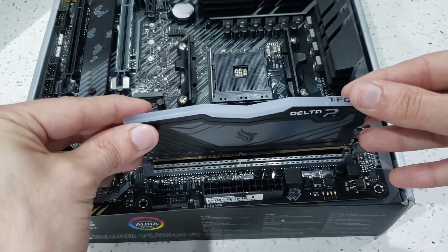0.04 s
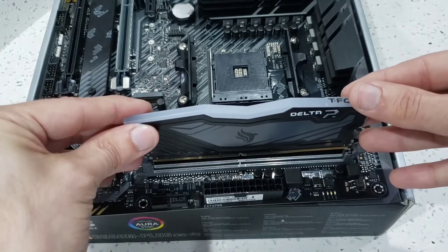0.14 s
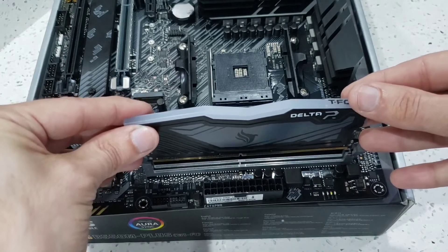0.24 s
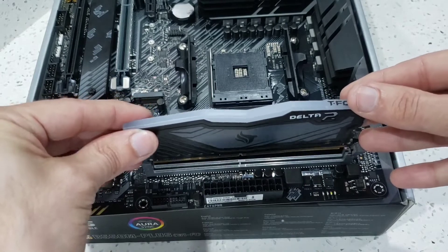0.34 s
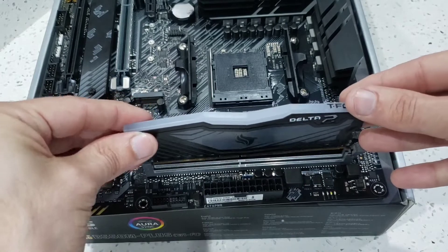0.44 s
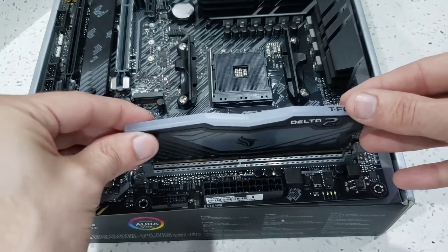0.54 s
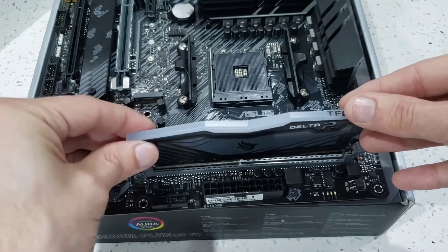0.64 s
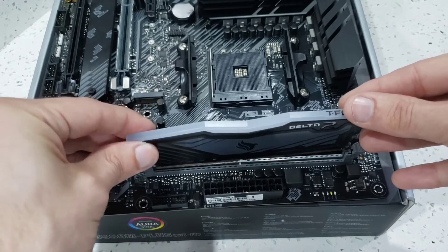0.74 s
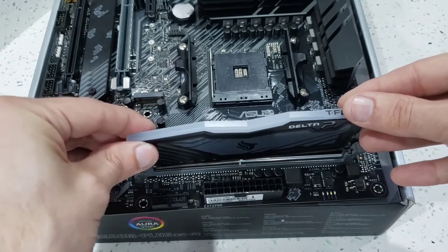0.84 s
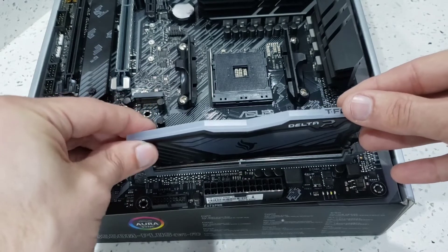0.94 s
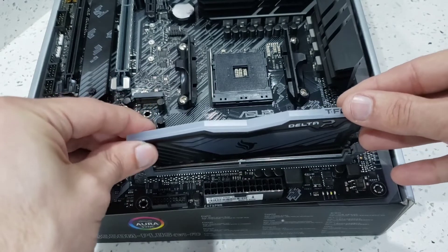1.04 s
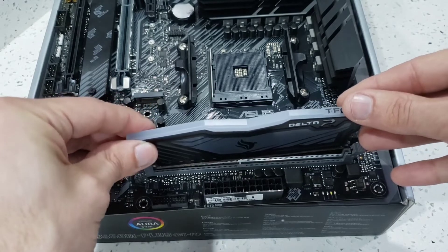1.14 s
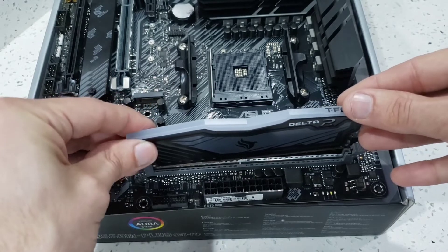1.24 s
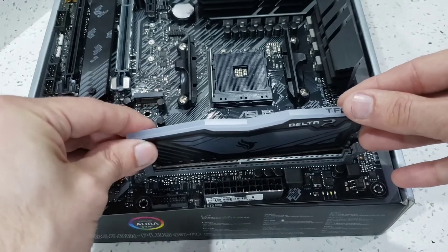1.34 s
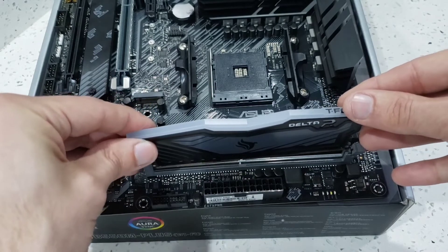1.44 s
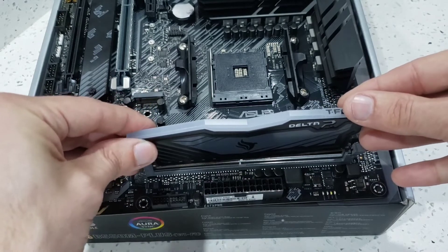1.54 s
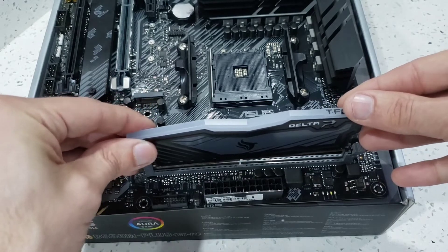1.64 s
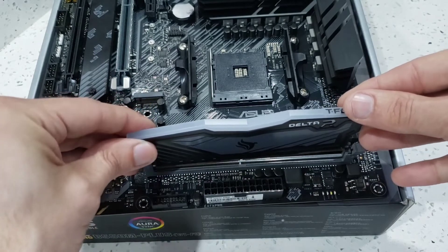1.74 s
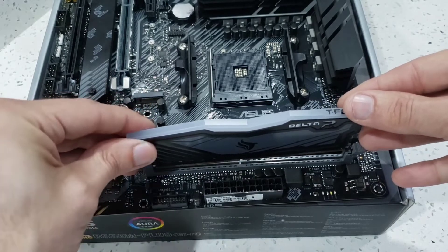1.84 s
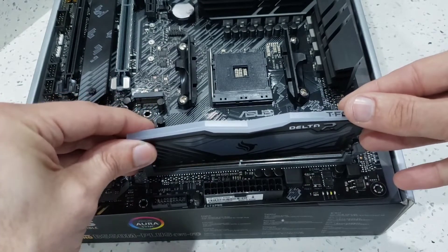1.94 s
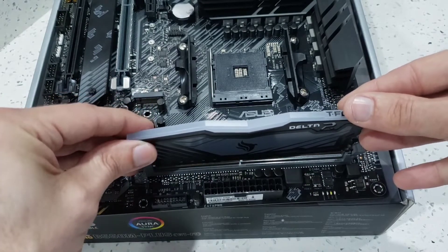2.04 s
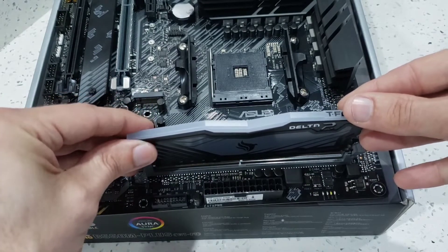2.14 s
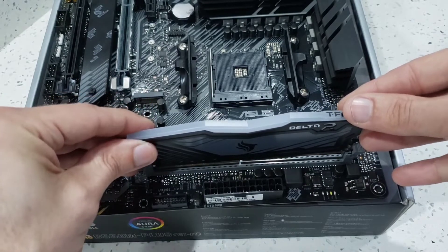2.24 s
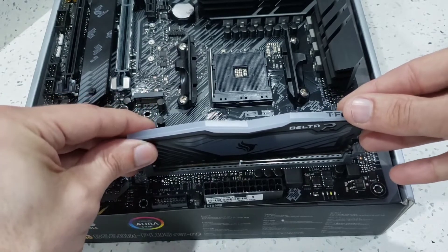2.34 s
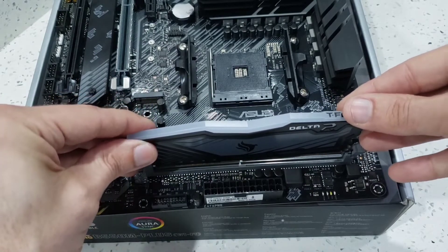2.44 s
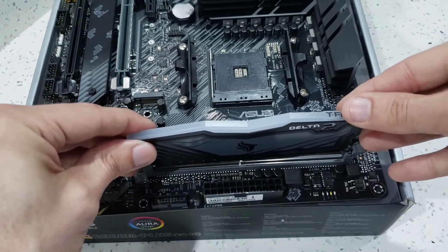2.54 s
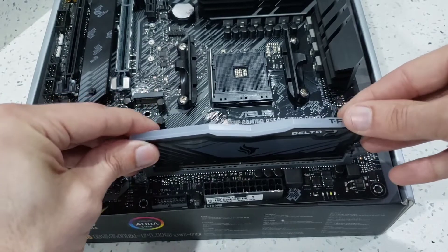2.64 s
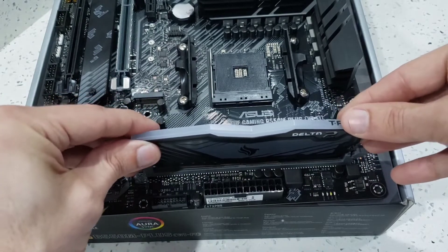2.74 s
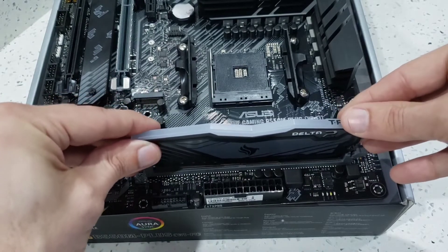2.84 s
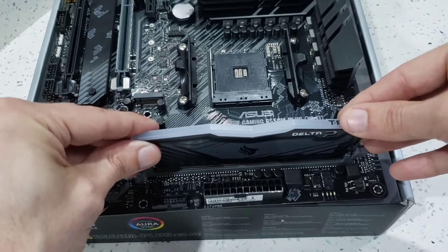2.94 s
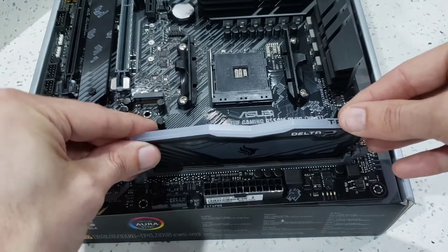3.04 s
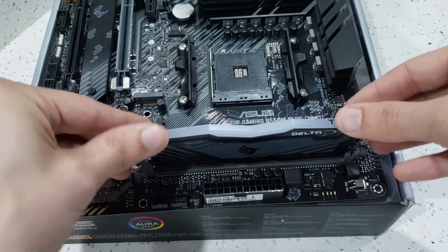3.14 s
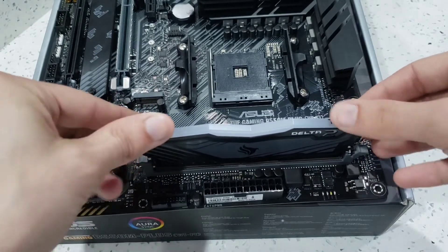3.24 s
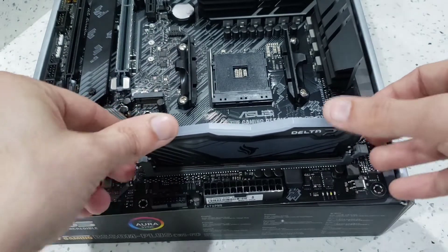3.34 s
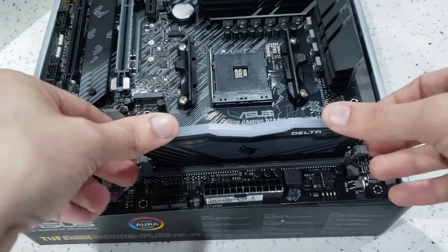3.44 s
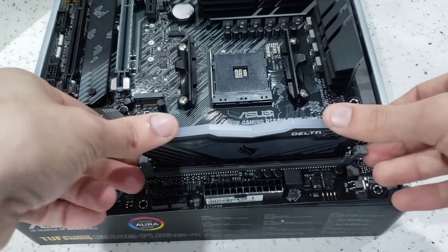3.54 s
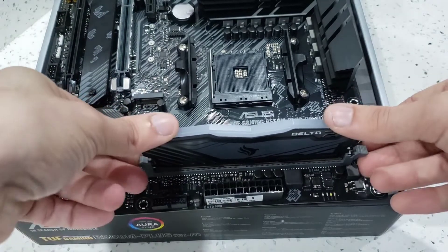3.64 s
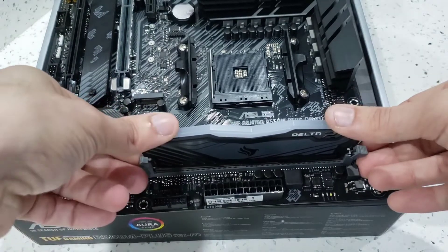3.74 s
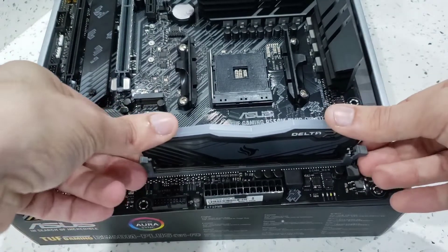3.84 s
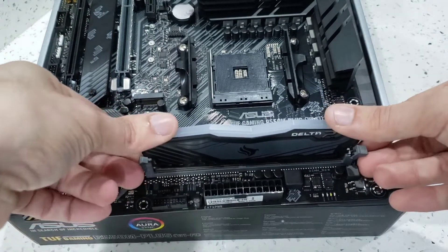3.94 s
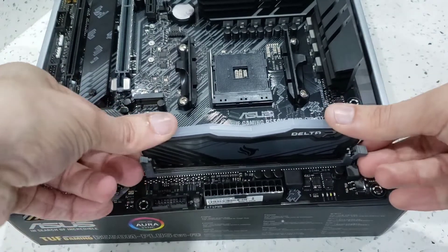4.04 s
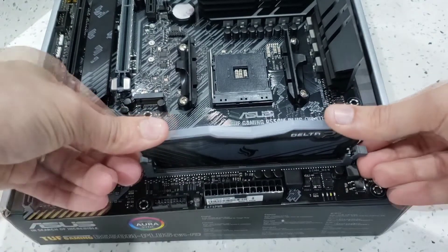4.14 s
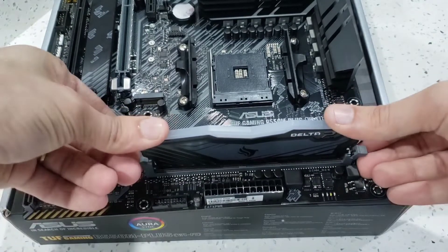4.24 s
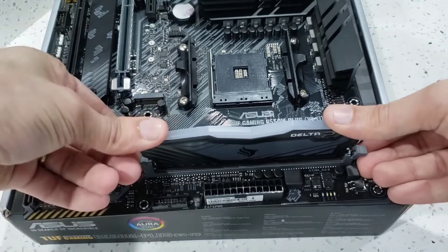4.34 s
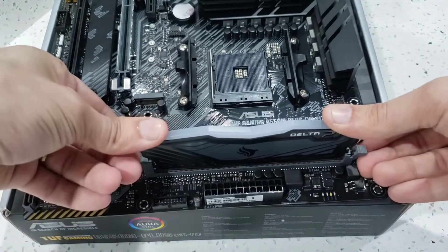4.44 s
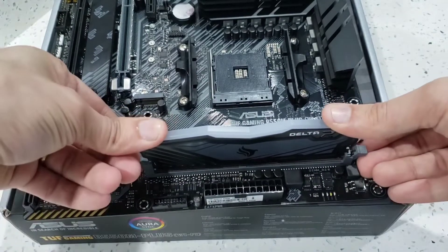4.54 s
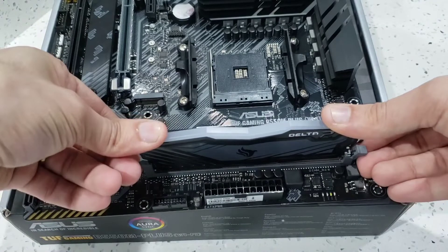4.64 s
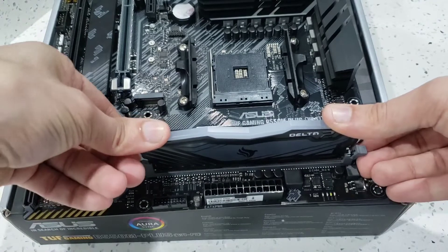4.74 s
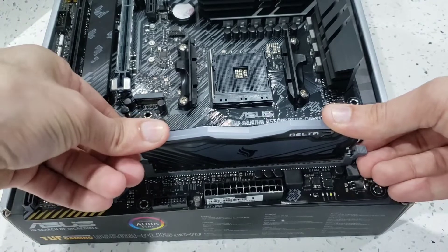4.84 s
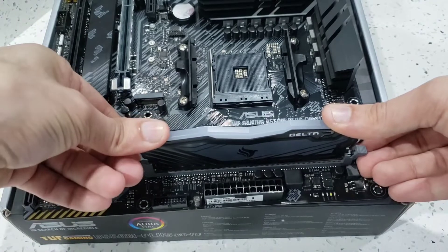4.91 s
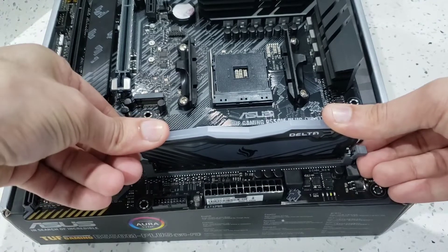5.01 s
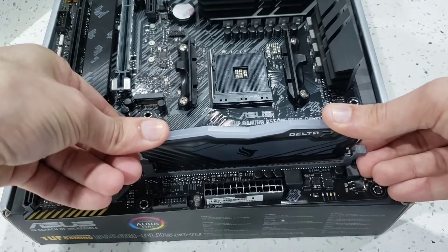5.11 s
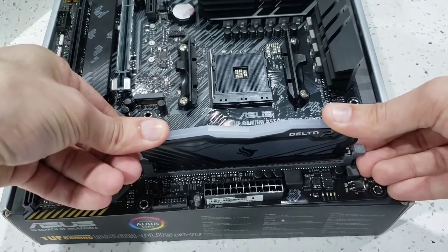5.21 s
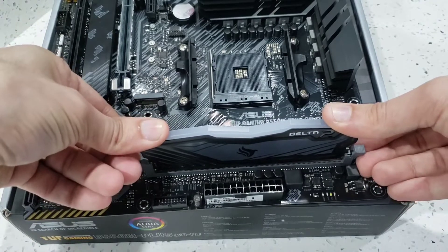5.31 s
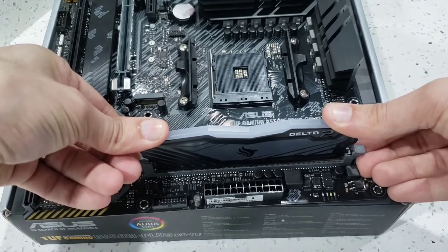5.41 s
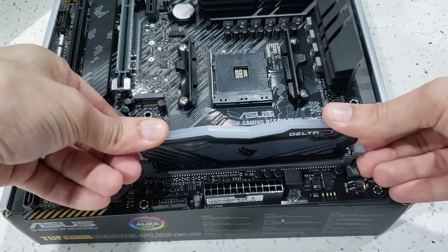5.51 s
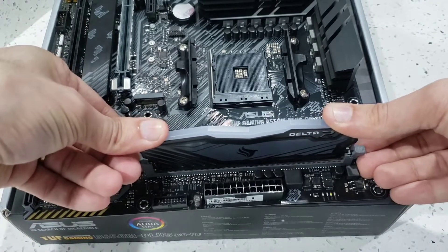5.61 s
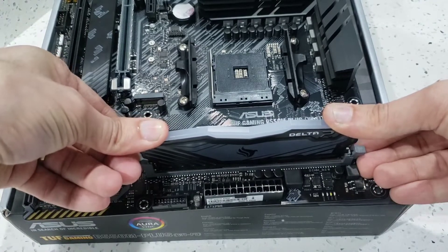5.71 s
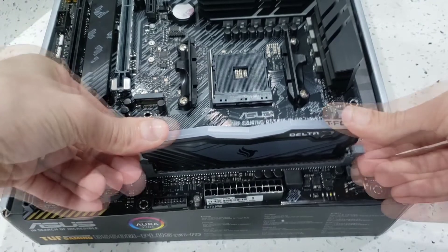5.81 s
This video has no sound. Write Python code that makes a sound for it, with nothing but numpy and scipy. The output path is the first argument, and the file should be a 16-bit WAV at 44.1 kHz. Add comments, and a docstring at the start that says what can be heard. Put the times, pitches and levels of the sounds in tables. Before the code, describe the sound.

A quiet small room with low mains hum, soft rumble, thin hiss and a barely perceptible high whine. From about 0.3 s fingers rub dully and soft shoves make the cardboard box thump; at 0.6-0.7 s the module's edge gives a short scratch and two light knocks. Fainter taps follow at 1.1-1.4 s and 1.9-2.0 s. At about 2.6-2.7 s a tight cluster of firmer, woody bumps and scrapes shakes board and box, with single knocks near 3.1 and 3.7 s, the latter with a tiny click. After a faint tick at 4.2 s, the first latch snaps at 4.56 s: a loud, bright crack, rapidly chattering, with a board thump and brief reverberation, then a small knock at 4.7 s. The second latch snaps at 5.18 s, crisp, sharp and shorter. The room settles, with a slight finger rub near 5.85 s.

```python
"""A small room: a memory module is slid into its slot on a motherboard that lies on a cardboard box.
Its edge scrapes as slip-modulated noise; knocks and shoves ring the board's modes and swing the box.
Pressed home, the latches snap shut one after the other: runs of noise cracks, latch modes and board blows.
Noise reflections form the room; finger rub, mains hum, a faint whine, rumble and hiss lie underneath."""
import sys
import numpy as np
from scipy import signal
from scipy.fft import rfft, irfft, next_fast_len
from scipy.io import wavfile

SR = 44100
rng = np.random.default_rng(int(sys.argv[2]) if len(sys.argv) > 2 else 0)


def wav_record(signal):
    """Record a signal, one row per channel, as 16-bit PCM in the file named by sys.argv[1]."""
    frames = np.transpose(np.atleast_2d(signal))
    bounded = np.clip(frames, -1, 1)
    # unit amplitude maps onto the largest positive 16-bit level
    quanta = np.round(bounded * 32767).astype(np.int16)
    wavfile.write(sys.argv[1], SR, quanta)


N = 258867
TIME = np.arange(N) / SR
AGE = TIME[:SR // 4]  # time since a blow, s


# Latches snapping shut, the second nudged once before it shuts: [t/s, level/dB before the layer trims]
FIRST_SNAPS = [(4.557, -1.5)]
SECOND_SNAPS = [(3.666, -24.5), (5.1768, -0.5)]


def chatter(snaps, count, gap_s, slowing, crack_db, crack_loss_db, ring_db, ring_loss_db,
            board_db, board_loss_db):
    """Each snap bounces into ever wider spaced contacts: rows of (s, crack dB, latch ring dB, board dB)."""
    widening = slowing ** np.arange(count)
    lags = gap_s * (np.cumsum(widening) - widening)
    contacts = []
    for s, db in snaps:
        for i in range(count):
            # crack and board change by a step per contact, the ring by a step per doubling of the contacts
            contact_crack_db = db + crack_db - crack_loss_db * i
            contact_ring_db = db + ring_db - ring_loss_db * np.log2(1 + i)
            contact_board_db = db + board_db - board_loss_db * i
            contacts.append((s + lags[i], contact_crack_db, contact_ring_db, contact_board_db))
    return contacts


# Ringing modes of each plastic latch: [f/Hz, relative level/dB, t60/s, left minus right/dB]
FIRST_LATCH_MODES = [(2030, -29, .025, 0), (2440, -27, .025, 0), (2920, -28, .025, 0), (3400, -25, .01, 0),
                     (4700, -27, .025, -3), (5320, -27, .018, 5), (6910, -25, .018, 7),
                     (7850, -25, .018, 2), (11890, -21, .035, -16), (12120, -19, .03, -16),
                     (12900, -20, .012, -14), (13980, -15, .02, -16), (14500, -5, .011, -20),
                     (14820, -11, .014, -18), (15500, -16, .01, -10)]
SECOND_LATCH_MODES = [(2320, -29, 0.079, 3), (3400, -17.5, 0.015, -5), (3310, -17, 0.019, -14),
                      (5300, -31, 0.02, 13), (6030, -32, 0.011, -24), (7700, -35.5, 0.021, 8),
                      (7720, -31.5, 0.0083, 14), (12140, -3, .005, 2), (12470, -3.5, 0.0074, -12.5),
                      (13600, -5.5, 0.0039, -28), (14800, -6, 0.0044, -22)]
# Noise colour of each latch's crack: [f/Hz, relative level/dB]
FIRST_CRACK_COLOUR = [(200, -5), (780, -4), (1050, -2), (1280, -7.5), (1650, -2.5), (2400, 0), (4200, -1.5),
                      (5500, -1.5), (7500, -3), (9000, -5.5), (11000, -6.5), (12000, -2.5), (13000, -6.5),
                      (14500, -2), (16000, 1)]
SECOND_CRACK_COLOUR = [(300, -24), (700, 2), (1150, -21), (1750, -6), (2270, 10), (2750, -2), (3450, 7),
                       (4600, -5), (5900, 1.5), (7400, 4.5), (8600, -6), (11000, -5.5), (13000, -13.5),
                       (16000, 8.5)]


def snap(contacts, latch_modes, crack_colour, crack_t60, board_hz):
    """A latch jumps its catch: every contact cracks the plastic, rings the latch and shakes the board."""
    out, burst = np.zeros((2, N)), np.zeros(N)
    for s, crack_db, ring_db, board_db in contacts:
        add(burst, s, from_db(crack_db - 60 * TIME[:SR // 10] / crack_t60))
        rings = 0
        for hz, db, t60, balance_db in latch_modes:
            # a random sign per mode and port, drawn anew at every contact
            random_signs = rng.choice([-1, 1], (2, 1))
            rings = rings + from_db(db) * random_signs * panned(balance_db) * ring(hz, t60)
        add(out, s, from_db(ring_db) * rings)
        add(out, s, from_db(board_db) * panned(balance_db=1.5) * board_blow(board_hz, focus=0.88))
    return out + burst * noise(crack_colour)


def seating(s, level_db, hz):
    """As the first latch gives, the module drops home and the box takes the push."""
    out = np.zeros((2, N))
    add(out, s, from_db(level_db) * panned(balance_db=2.5) * box_thud(hz, t60=0.12, swell_s=0.002))
    return out


# Module against slot:
# [t/s, knock level/dB before trim, hit brightness f/Hz, thud level/dB before trim, rocking gap/s]
SLOT_KNOCKS = [(0.618, -42.5, 676, -62, .005), (0.721, -41.5, 560, -60, 0.0044),
               (1.128, -49, 524, -52, 0.0029), (1.27, -50, 450, -57, .005), (1.409, -47, 400, -74, 0.0044),
               (1.866, -45.5, 360, -49, 0.0064), (1.901, -47, 363, -60, 0.0055),
               (1.992, -45, 315, -76, 0.0038), (2.584, -40.5, 640, -31.5, 0.011),
               (2.615, -33, 370, -31, 0.0072), (2.710, -34.5, 1280, -30.5, .0105),
               (3.100, -32.5, 494, -30.5, 0.0059), (3.667, -30, 460, -28, .012),
               (4.179, -53, 720, -64, .005), (4.684, -37, 1220, -39.5, 0.015)]
# Every knock rocks: a light, bright touch, the hit, then a dull settling
TOUCH_DB, TOUCH_BRIGHTER = -8, 1.475
SETTLE_DB, SETTLE_DULLER = -7.5, .6
BOX_HZ = 134


def knocks(knock_db, thud_db):
    """The module bumps in the slot: three contacts ring the board, and the settling swings the box."""
    out = np.zeros((2, N))
    for s, blow_db, brightness_hz, push_db, gap in SLOT_KNOCKS:
        contacts = [(-gap, TOUCH_DB, TOUCH_BRIGHTER), (0, 0, 1), (gap, SETTLE_DB, SETTLE_DULLER)]
        for lag, db, hardness in contacts:
            add(out, s + lag, from_db(blow_db + knock_db + db) * board_blow(brightness_hz * hardness))
        add(out, s + gap, from_db(push_db + thud_db) * box_thud(BOX_HZ, t60=0.12, swell_s=0.0021))
    return out * panned(balance_db=3.0)


# Hands softly shoving board and box: [t/s, push level/dB before the box and board trims, thud f/Hz]
HAND_SHOVES = [(0.277, -37, 101), (0.387, -39, 90.6), (0.567, -35, 83.6), (0.587, -32, 78),
               (2.568, -37.5, 90), (2.603, -39, 74), (2.957, -44.5, 89), (3.024, -37, 81),
               (3.668, -38.5, 93), (4.598, -37, 120.6)]
SHOVE_BOARD_DB, SHOVE_BRIGHTNESS_HZ = -12.5, 480  # how much of a shove the board takes up


def shoves(thud_db):
    """A soft push swings the box and barely sounds the board."""
    out = np.zeros((2, N))
    for s, push_db, push_hz in HAND_SHOVES:
        add(out, s, from_db(push_db + thud_db) * box_thud(push_hz, t60=0.12, swell_s=0.0025))
        add(out, s, from_db(push_db + SHOVE_BOARD_DB) * board_blow(SHOVE_BRIGHTNESS_HZ))
    return out * panned(balance_db=2.5)


# Main modes of the board on its box: [f/Hz, relative level/dB, t60/s]
BOARD_MODES = [(207, -1, 0.13), (258.7, 5.5, 0.12), (322, 0.5, 0.14), (367, -1, 0.095), (432.2, 3.5, 0.1),
               (487.6, -1.5, .08), (646, -2, 0.085), (765.7, 0, 0.061), (862, -3.5, 0.045),
               (1028.5, 0, 0.044), (1474, -9, 0.095), (1730, -5.5, 0.043), (2260, -17.5, 0.051)]
CLACK_DB, CLACK_T60 = -7, .05  # t60 in s


def board_blow(brightness_hz, focus=1.5):
    """A blow rings the board's modes over a noise clack; its hardness picks the range. Peak 1."""
    strengths = from_db(rng.uniform(-2, 2, (len(BOARD_MODES), 2, 1)))
    modes = 0
    for k, (hz, db, t60) in enumerate(BOARD_MODES):
        modes = modes + (-1) ** k * strengths[k] * from_db(db) * ring(hz, t60)
    # the noise stands for many closely packed, damped modes
    clack_band = signal.butter(2, [300, 2400], "band", fs=SR, output="sos")
    dense = signal.sosfilt(clack_band, rng.standard_normal(modes.shape))
    clack = dense / dense.std() * from_db(CLACK_DB - 60 * AGE / CLACK_T60)
    # a resonant low-pass at the contact brightness, then a gentle high-pass an octave below
    w = 2 * np.pi * brightness_hz
    out = signal.lfilter(*signal.bilinear([w * w], [1, w / focus, w * w], SR), modes + clack)
    out = signal.lfilter(*signal.butter(1, min(brightness_hz / 2, SR / 4), "high", fs=SR), out)
    return out / np.abs(out).max()


def box_thud(hz, t60, swell_s):
    """The cardboard box gives way and swings: a low, decaying mode with a soft onset."""
    return ring(hz, t60) * (1 - np.exp(-AGE / swell_s))


def ring(hz, t60):
    """One struck mode: a sine dying away exponentially."""
    return np.sin(2 * np.pi * hz * AGE) * from_db(-60 * AGE / t60)


# Module edge sliding in the guides: [t/s, length/s, level/dB before slip modulation]
GUIDE_SLIDES = [(0.38, .02, -64.5), (0.578, .024, -46.5), (1.845, 0.062, -69), (2.571, .058, -54),
                (2.698, 0.012, -51), (2.985, 0.049, -67), (3.099, .002, -59), (3.324, .003, -64),
                (3.662, .006, -53), (4.177, .005, -63), (4.554, .002, -39), (4.676, .012, -42)]
# Noise colour of the sliding edge: [f/Hz, relative level/dB]
SCRAPE_COLOUR = [(710, -31.5), (1200, -12), (2250, -7.5), (3150, -13.5), (3400, -8.5), (4130, -13.5),
                 (6000, -8), (7100, -5), (8350, -14), (10600, -9.5), (11600, -3.5), (12700, -6),
                 (13700, -1), (16000, -5)]
SLIDE_RISE_S, SLIDE_FALL_S = 0.011, 0.015


def scrapes(grain_db, slips_per_s):
    """Short slides: a hiss broken into tiny random slips, swelling and dying with the stroke."""
    stroke = strokes(GUIDE_SLIDES, SLIDE_RISE_S, SLIDE_FALL_S)
    slips = np.interp(TIME * slips_per_s, np.arange(N), rng.standard_normal(N))
    return stroke * from_db(grain_db * slips) * noise(SCRAPE_COLOUR)


# Fingers rubbing as they shift their grip: [t/s, length/s, level/dB before trim]
GRIP_SHIFTS = [(0.3, 0.58, -68.5), (1.3, 0.67, -61.5), (2.6, 1, -66), (3.24, 0.37, -63), (4.17, 0.16, -63),
               (5.85, .05, -57)]
# Noise colour of the finger rub: [f/Hz, relative level/dB]
GRIP_RUB_COLOUR = [(150, -9.5), (255, 2.5), (330, -1.5), (435, 3.5), (560, -6), (760, -15.5), (1100, -16)]
GRIP_RISE_S, GRIP_FALL_S, GRIP_REST_DB = 0.037, 0.1, -74.5  # resting level before trim


def finger_rub(grip_db):
    """Fingers rub dully: dark noise swells with each shift of grip over a faint resting level."""
    pressure = from_db(GRIP_REST_DB) + strokes(GRIP_SHIFTS, GRIP_RISE_S, GRIP_FALL_S)
    return from_db(grip_db) * pressure * noise(GRIP_RUB_COLOUR)


def strokes(rows, rise_s, fall_s):
    """The pressure of rubbing strokes: each swells, holds for its length and dies away."""
    pressure = 0
    for s, length, db in rows:
        before = (np.maximum(s - TIME, 0) / rise_s) ** 2
        after = np.maximum(TIME - s - length, 0) / fall_s
        pressure = pressure + from_db(db) * np.exp(-np.minimum(before + after, 20))
    return pressure


# Reverberation time of the room: [f/Hz, t60/s]
ROOM_DECAY = [(100, 0.28), (1000, 0.45), (2500, 0.4137), (6500, 0.4554), (10000, 0.35), (15000, 0.18)]
# Strength of the reverberation in each noise band: [f/Hz, level/dB]
ROOM_STRENGTH = [(100, -8), (500, -4), (2500, -3), (7000, -6), (10000, -3), (12000, -4), (15000, -9)]


def room(x):
    """Dense reflections from near walls: noise bands that build up fast and fade each at its own rate."""
    age = TIME[:int(SR / 2) + SR // 10]
    edges = np.geomspace(50, 17500, 15)
    white, response = rng.standard_normal((2, 2, len(age))), 0
    for k, (low, high) in enumerate(zip(edges, edges[1:])):
        hz = np.sqrt(low * high)
        fade = from_db(-60 * age / at_hz(ROOM_DECAY, hz))
        fade = fade * (1 - np.exp(-(age / 0.0037) ** 2))
        # neighbouring bands draw on different noise
        band = signal.sosfilt(signal.butter(2, [low, high], "band", fs=SR, output="sos"), white[k % 2])
        pair = at_ports(band[0], band[1], hz) / np.sqrt(2)
        response = response + pair * fade / np.linalg.norm(fade) * from_db(at_hz(ROOM_STRENGTH, hz))
    return signal.fftconvolve(x, response, axes=1)[:, :N]


def tone(hz, level_db, balance_db):
    """A steady sine at an rms level, panned."""
    return from_db(level_db) * np.sqrt(2) * np.sin(2 * np.pi * hz * TIME) * panned(balance_db)


# Noise colours of the room rumble and the microphone hiss: [f/Hz, relative level/dB]
RUMBLE_COLOUR = [(45, -15.5), (62, -10.5), (82, -3.5), (100, -3), (125, -2), (160, -10.5), (200, -16),
                 (250, -13), (310, -17.5), (430, -31.5), (600, -33), (900, -42.5), (1500, -43.5)]
HISS_COLOUR = [(1000, -12), (2000, -4.5), (4000, -7), (6000, -10.5), (7350, -1), (8400, -12), (10000, -8.5),
               (12000, -1.5), (14000, -3), (15500, -8.5)]


def background(rumble_db, hiss_db):
    """Mains hum and a faint electronic whine as sines; room rumble and microphone hiss as noise."""
    hum = tone(hz=59.4, level_db=-52.5, balance_db=1.2)
    whine = tone(hz=11980, level_db=-87.5, balance_db=-12.5)
    rumble = from_db(rumble_db) * noise(RUMBLE_COLOUR)
    hiss = from_db(hiss_db) * noise(HISS_COLOUR)
    return hum + whine + rumble + hiss


# Likeness of the sound at the two microphone ports: [f/Hz, likeness/0 to 1]
PORT_SIMILARITY = [(60, 1), (250, 0.73), (500, 0.62), (1000, 0), (2500, 0), (16000, 0)]


def at_ports(mid, side, hz):
    """Two independent noises mix into a left and right pair, as alike as the ports hear them."""
    alike = np.clip(at_hz(PORT_SIMILARITY, hz), 0, 1)
    return np.sqrt(1 + alike) * mid + np.sqrt(1 - alike) * side * [[1], [-1]]


# Level difference between the two microphone ports: [f/Hz, left minus right/dB]
PORT_DIFFERENCE = [(100, 2), (1000, -0.5), (2500, 1.5), (4500, -2), (7300, 7.5), (8600, -3), (10500, -6),
                   (12000, -9), (15000, -7.5)]


def noise(spectrum):
    """Stereo noise of a given colour at the two ports, falling away past the table's ends; rms 1."""
    size = next_fast_len(N)
    hz = np.maximum(np.fft.rfftfreq(size, 1 / SR), 1)
    mid, side = rfft(rng.standard_normal((2, size)))
    pair = at_ports(mid, side, hz) * panned(at_hz(PORT_DIFFERENCE, hz))
    skirts = np.minimum(1, np.minimum(hz / spectrum[0][0], spectrum[-1][0] / hz)) ** 3
    out = irfft(pair * skirts * from_db(at_hz(spectrum, hz)), size)[:, :N]
    return out / np.sqrt(np.mean(out ** 2))


def from_db(db):
    """Decibels to gain."""
    return 10 ** (np.asarray(db) / 20)


def at_hz(points, hz):
    """Read a table on a log-frequency axis."""
    known_hz, values = np.transpose(points)
    return np.interp(np.log(np.maximum(hz, 1)), np.log(known_hz), values)


def panned(balance_db):
    """Left and right gains for a level difference, left minus right."""
    return from_db(np.array([[1], [-1]]) * balance_db / 2)


def add(out, s, sound):
    """Mix a sound in at a given time."""
    start = int(s * SR)
    out[..., start:start + sound.shape[-1]] += sound[..., :N - start]


def gain_control(x, threshold_db, slope, lag_s):
    """Peaks over the threshold turn the gain down smoothly, and it stays down."""
    level_db = 20 * np.log10(np.abs(x).max(axis=0) + 1e-9)
    over = np.maximum(level_db - threshold_db, 0) * slope
    cut = np.maximum.accumulate(over)
    lag = np.exp(-1 / (lag_s * SR))
    return x * from_db(-signal.lfilter([1 - lag], [1, -lag], cut))


def scene():
    """Two latch snaps, the handling, the room and its floor."""
    first_contacts = chatter(FIRST_SNAPS, count=8, gap_s=.0011, slowing=1.38,
                             crack_db=-15.0, crack_loss_db=2.0, ring_db=-4.0, ring_loss_db=6.5,
                             board_db=-24.5, board_loss_db=2.14)
    # the second latch's cracks grow very slightly from contact to contact
    second_contacts = chatter(SECOND_SNAPS, count=4, gap_s=0.0014, slowing=1.1,
                              crack_db=-24.5, crack_loss_db=-0.16, ring_db=-16.5, ring_loss_db=4.0,
                              board_db=-41.5, board_loss_db=0.9)
    first = snap(first_contacts, FIRST_LATCH_MODES, FIRST_CRACK_COLOUR, crack_t60=0.022, board_hz=960)
    second = snap(second_contacts, SECOND_LATCH_MODES, SECOND_CRACK_COLOUR, crack_t60=0.026, board_hz=624)
    latching = first + second + seating(s=4.556, level_db=-23.5, hz=106)
    blows = latching + knocks(knock_db=0.5, thud_db=1.0) + shoves(thud_db=5.5)
    sliding = scrapes(grain_db=2.5, slips_per_s=510)
    # the slot shades the sliding edge, so less of it reaches the walls
    reflections = room(blows + from_db(-3) * sliding)
    floor = finger_rub(grip_db=-4.5) + background(rumble_db=-55, hiss_db=-74.5)
    return blows + sliding + reflections + floor


def record(dry):
    """Loud peaks pull the gain down for good, the loudest are rounded and the top is cut."""
    turned_down = gain_control(dry, threshold_db=-17.5, slope=0.15, lag_s=.15)
    rounded = np.tanh(turned_down)
    top_cut = signal.ellip(10, .2, 80, 15900, fs=SR, output="sos")  # steep low-pass, Hz
    return signal.sosfilt(top_cut, rounded)


dry = scene()
out = record(dry)
wav_record(out)
```